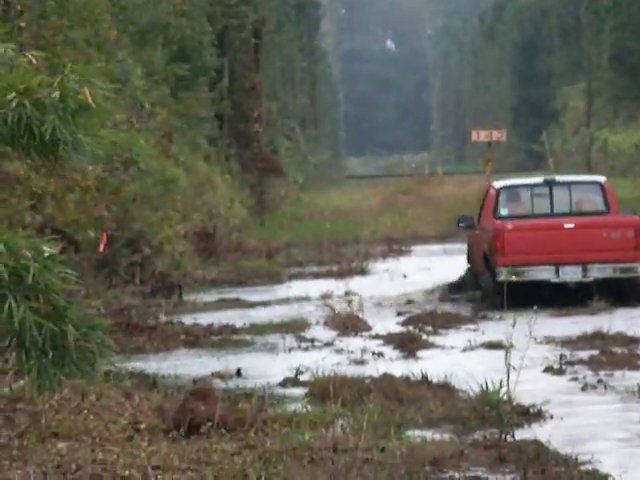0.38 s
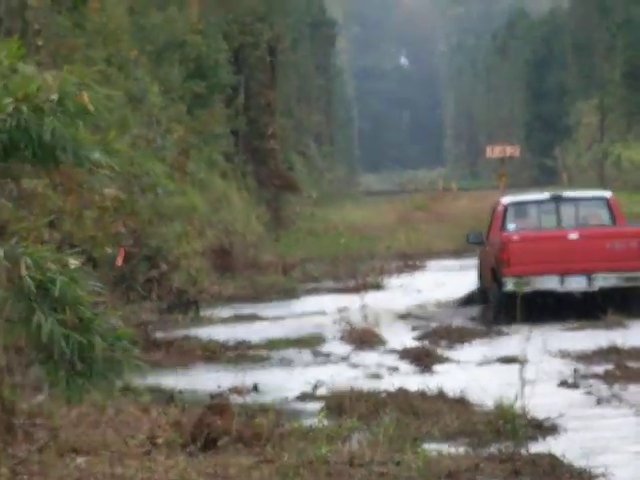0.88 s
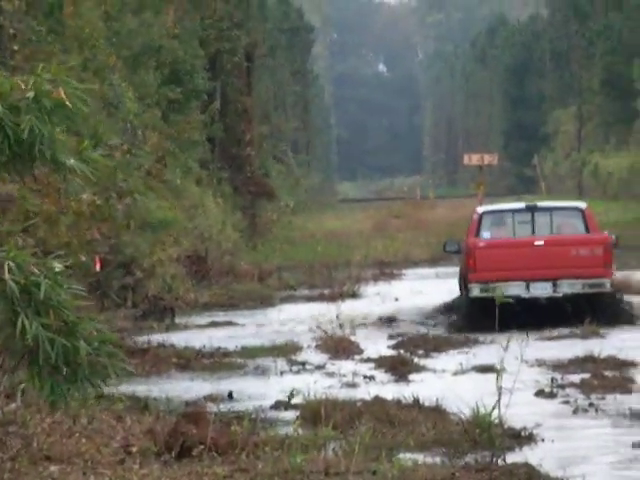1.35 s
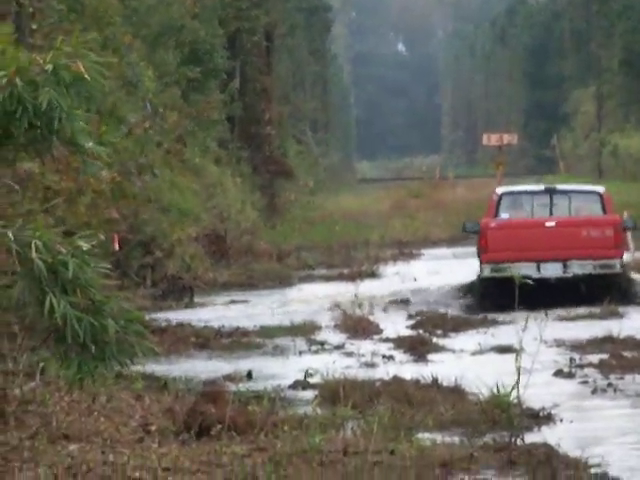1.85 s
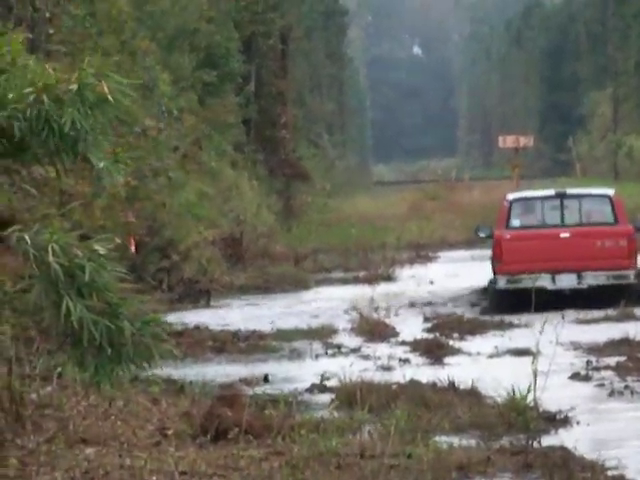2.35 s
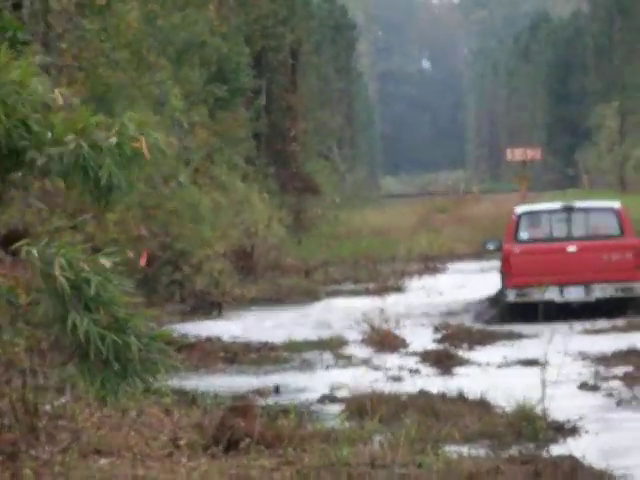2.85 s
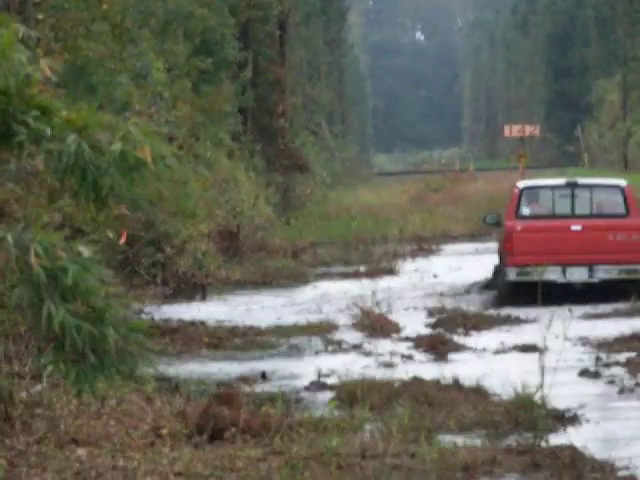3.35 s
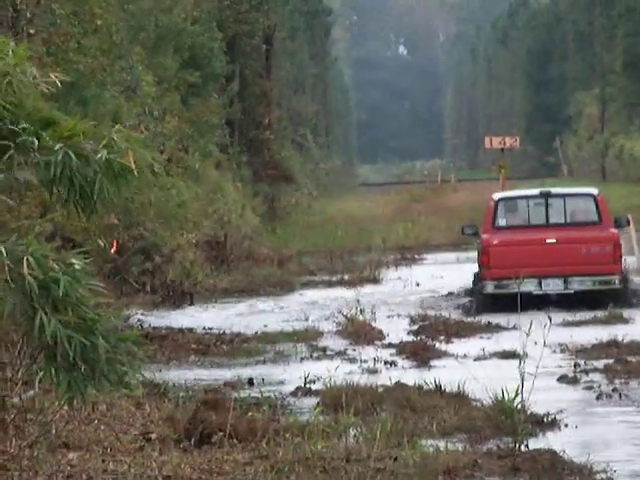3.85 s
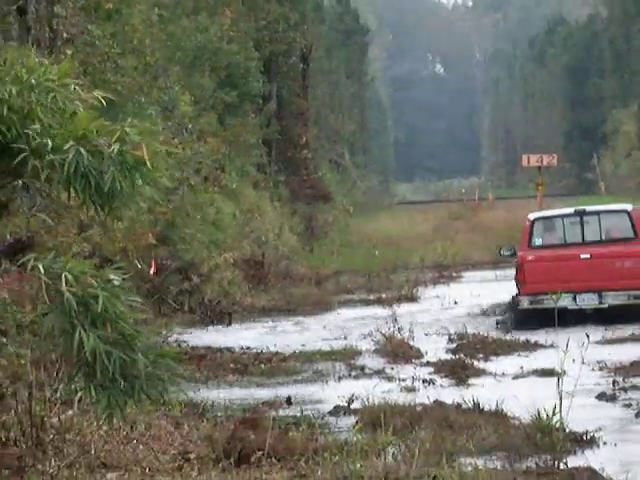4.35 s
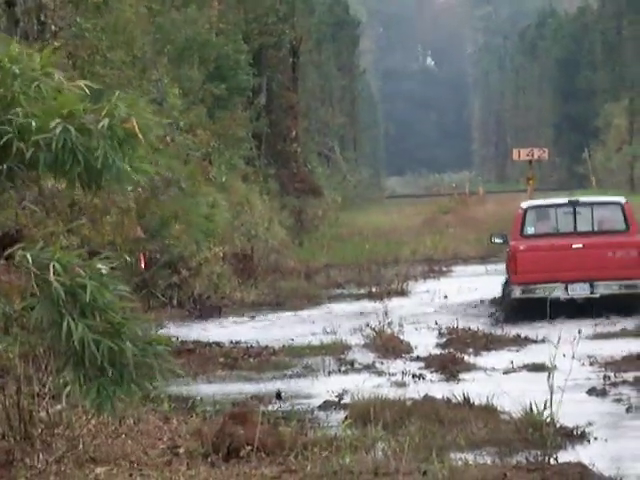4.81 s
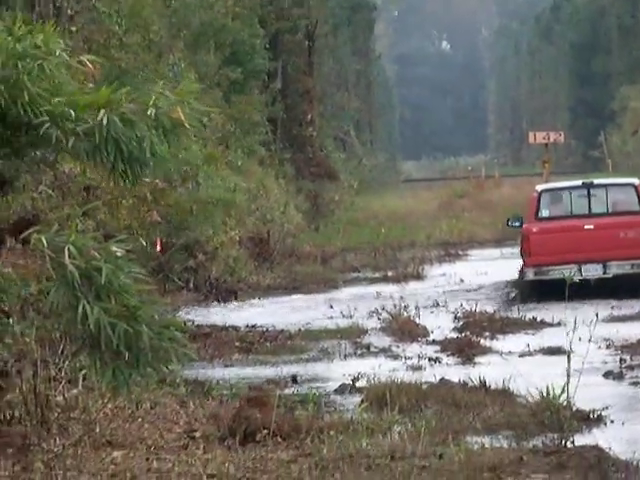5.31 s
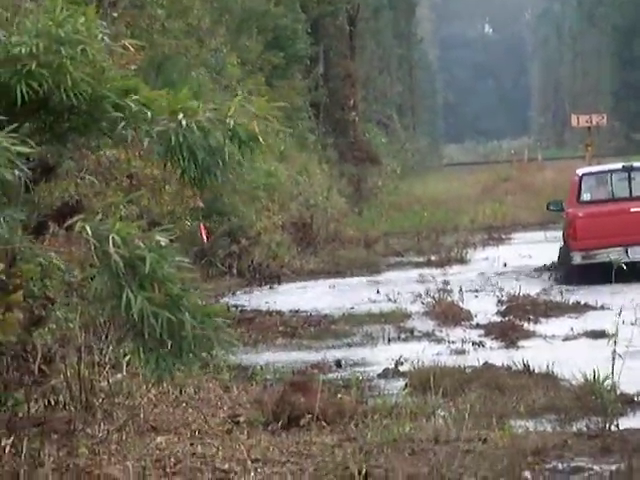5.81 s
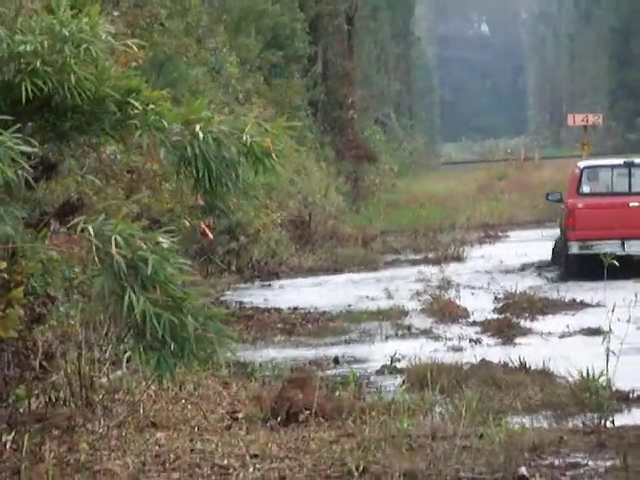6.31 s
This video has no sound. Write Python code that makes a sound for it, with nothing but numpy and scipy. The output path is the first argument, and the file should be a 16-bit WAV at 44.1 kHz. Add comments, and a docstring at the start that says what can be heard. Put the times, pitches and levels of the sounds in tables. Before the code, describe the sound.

A straining truck engine drones at some distance across a flooded muddy track, with humming metal, faint whines and flickering water spray. Low wind rumble and blunt thumps strike each side of the unshielded microphone. The engine sound sinks abruptly under a heavy gust, stays subdued, then rises to full strength. Two small rising mud bubbles pop soon after, and the roar continues to the end without stopping.

```python
"""A pickup stuck in deep mud holds its engine at a nearly steady speed. Exhaust, fan and whines are sums of
sine tones; the broad roar, humming panels and hiss of thrown water are shaped noise. The truck's level as
heard drops sharply near 1.8 s as a gust hits, as if the recorder turned itself down, and is back up by 4 s.
Two rising tones are bubbles leaving the mud. Wind buffets the two microphone ports separately, as low noise
in gusts and as short pointed swings."""
import sys
import numpy as np
from scipy import signal
from scipy.fft import rfft, irfft, next_fast_len
from scipy.io import wavfile
from scipy.ndimage import uniform_filter1d

SR = 44100
rng = np.random.default_rng(int(sys.argv[2]) if len(sys.argv) > 2 else 0)


def waveform_to_disk(signal):
    """Save audio, clipped to [-1, 1], as 16-bit WAV at the path in sys.argv[1]."""
    frames = np.transpose(np.atleast_2d(signal))
    scaled = np.clip(frames, -1, 1) * 32767
    samples = np.round(scaled).astype(np.int16)
    wavfile.write(sys.argv[1], SR, samples)


def ratio_of_db(decibels):
    """Turn decibels (scalar or array-like) into linear amplitude factors; 0 dB maps to 1."""
    return 10 ** (np.asarray(decibels, float) / 20)


N = 294588  # length of the scene in samples
USUAL_DB = -26.5  # the usual level at which the truck is heard


def evened(x):
    """Scales a signal to an rms of 1."""
    return x / np.sqrt(np.mean(x ** 2) + 1e-20)


def read(points, hz):
    """Reads a table of (Hz, value) at any frequency, along a logarithmic pitch scale."""
    f, value = np.transpose(points)
    return np.interp(np.log(hz + 1), np.log(f + 1), value)


def curve(rows, t):
    """Reads a table of (seconds, value) at the times t, with straight lines between rows."""
    seconds, value = np.transpose(rows)
    return np.interp(t, seconds, value)


def wander(top_hz):
    """Slow random drift of rms 1: twenty sines from 0.3 Hz to top_hz, the slower ones stronger."""
    t = np.arange(0, N + 256, 256)
    slow = 0
    for f in np.geomspace(.3, top_hz, 20):
        slow = slow + np.sin(2 * np.pi * (f * t / SR + rng.random())) / np.sqrt(f)
    return np.interp(np.arange(N), t, evened(slow))


def ports(x):
    """The truck at two ports: each frequency differs in level and arrives earlier at one of them."""
    # The right port resonates lower than the left.
    # Each row: frequency in Hz, level of left over right in dB.
    lean = [(60, .6), (270, 1.2), (600, 2.4), (950, 1.2), (1300, 2), (2240, -4.3), (2700, -3), (3400, -6.5),
            (4050, -5.6), (4750, -10), (5080, -3), (5350, 5.5), (5850, 15), (6400, 13.3), (7150, 10),
            (7900, 5.5)]
    # How far the left port is ahead. Each row: frequency in Hz, lead in radians.
    lead = [(0, 0), (600, -.05), (1120, -.45), (1400, -1), (1890, -1.4), (2150, -.9), (2900, -1.6),
            (3700, -.6), (4300, -.3), (5340, 1.9), (5770, .7), (6300, 2), (8000, 0)]
    size = next_fast_len(N)
    hz = np.fft.rfftfreq(size, 1 / SR)
    # Half of each difference goes to the left, the opposite half to the right.
    half = ratio_of_db(read(lean, hz) / 2) * np.exp(.5j * read(lead, hz))
    both = rfft(x, size) * np.array([half, 1 / half])
    return irfft(both, size)[:, :N]


def noise(gain_per_hz, patchy_db, size=1024):
    """Noise of rms 1 from random short-time spectra with drifting patches, partly alike on both sides."""
    # How alike left and right are. Each row: frequency in Hz, likeness from 0 to 1.
    likeness = [(60, .97), (250, .97), (600, .89), (1000, .82), (1500, .55), (2500, .35), (3800, .6),
                (4800, .35), (5800, .27), (6200, .11), (8000, .15)]
    frames, hz = 4 * N // size + 5, np.fft.rfftfreq(size, 1 / SR)
    a, b, c, d, patches = rng.standard_normal((frames, len(hz), 5)).T
    patches = uniform_filter1d(patches, size=12, axis=0)
    patches = evened(uniform_filter1d(patches, size=14, axis=1))
    same = np.clip(read(likeness, hz), -1, 1)[:, None]
    left = a + 1j * b
    right = same * left + np.sqrt(1 - same ** 2) * (c + 1j * d)
    spectra = np.array([left, right]) * gain_per_hz(hz)[:, None] * ratio_of_db(patchy_db * patches)
    sound = signal.istft(spectra, nperseg=size, noverlap=size - size // 4)[1]
    return evened(sound[:, :N])


def tones(turns, rows, sway, lead=0):
    """Sines at multiples of one rotation, each wandering in strength and, by sway radians, in phase."""
    total = 0
    for multiple, db, wander_db in rows:
        strength = np.sqrt(2) * ratio_of_db(db + wander_db * wander(5.2))
        phase = 2 * np.pi * multiple * turns + lead + sway * wander(4)
        total = total + strength * np.sin(phase)
    return total


def gusts(t):
    """Wind power at each port and the corner pitch: a constant breeze plus one smooth swell per gust."""
    # Each row: middle in seconds, length in seconds, left port level in dB, right port level in dB,
    # corner in Hz above which the gust's buffeting fades.
    gust_rows = [(.05, 0.2, -16.5, -21.5, 35), (0.347, 0.14, -17, -21, 40), (.7, .15, -24, -23.5, 35.2),
                 (1.106, .3, -19.5, -18, 34.8), (1.333, 0.17, -21.5, -19, 98.4),
                 (1.619, 0.75, -18, -11, 24.1), (1.842, 0.15, -12, -10.5, 152.5),
                 (2.088, 0.6, -17.5, -17, 25.4), (2.78, .55, -22, -15.5, 30.1),
                 (3.148, 0.37, -18, -18.5, 40), (3.577, .25, -21.5, -17.5, 35),
                 (4.244, 0.61, -18.5, -17, 39.9), (4.579, .3, -22.5, -14.5, 30),
                 (4.823, 0.46, -15, -15, 45), (5.301, 0.35, -26.5, -16.5, 56.3),
                 (5.578, 0.24, -15.5, -18, 24), (6.0, 0.27, -23.5, -26.5, 70), (6.52, .15, -23, -26.5, 45)]
    lull, lull_hz = ratio_of_db(2 * -28), 45  # power and corner of the breeze between gusts
    middle, length, left_db, right_db, corner_hz = np.transpose(gust_rows)[..., None]
    swell = np.cos(np.pi * np.clip((t - middle) / length, -.5, .5)) ** 2
    power = ratio_of_db(2 * np.array([left_db, right_db])) * swell
    both = power.sum(0)
    # The stronger a gust is at this moment, the more its corner counts.
    mixed_hz = (2 * lull * lull_hz + (both * corner_hz).sum(0)) / (2 * lull + both.sum(0))
    return lull + power.sum(1), mixed_hz


def wind():
    """Lumpy low pressure noise, unrelated at the two ports; sharp gusts reach higher in pitch."""
    frames, hz = N // 512 + 9, np.fft.rfftfreq(4096, 1 / SR)[:, None]
    frame_times = (np.arange(frames) * 512 - 256) / SR
    corner_hz = np.maximum(gusts(frame_times)[1], 10)
    shape = hz / (hz + 6.1) / (1 + (hz / corner_hz) ** 2) ** 1.18
    shape /= np.sqrt((shape ** 2).sum(0))  # the corner changes the color, not the power
    a, b = rng.standard_normal((frames, 2049, 2, 2)).T
    air = signal.istft((a + 1j * b) * shape, nperseg=4096, noverlap=3584)[1]
    air = evened(air[:, :N])
    # Chance swells are partly levelled.
    lumps = np.sqrt(0.2 + abs(uniform_filter1d(air ** 2, size=3000, axis=1)))
    flutter = ratio_of_db(2.5 * np.array([wander(12), wander(17)]))  # each port flutters by itself, 2.5 dB rms
    strength = np.sqrt(gusts(np.arange(N) / SR)[0])
    return strength * flutter * evened(air / lumps)


def buffets():
    """Each eddy slaps one port: a pointed push or pull, centred on its time, that swings and fades."""
    # Each row: middle in seconds, level in dB (the pointed peak stands 1 dB above it),
    # port (L or R), swing rate in Hz, length in seconds.
    buffet_rows = [(0.052, -11, "R", 60, 0.029), (0.124, -9, "R", 60, .035), (0.321, 2, "L", 55, 0.044),
                   (0.672, -10, "R", 60, .04), (0.709, -11, "L", 45, .05), (0.996, -11, "R", 75, .04),
                   (1.117, -8, "L", 60, 0.044), (1.315, -5.5, "L", 107, 0.041), (1.482, -5, "R", 70, .04),
                   (1.553, -2.5, "R", 59.4, .04), (1.658, -6, "L", 50, .04), (1.709, -11.5, "L", 55, 0.028),
                   (1.762, -10.5, "R", 130, .04), (1.802, -4.5, "L", 60, .035),
                   (1.839, -0.5, "R", 100.5, 0.05), (1.862, -9.5, "L", 149, 0.036),
                   (1.864, -11, "L", 330, .03), (1.909, -4, "L", 49.8, .045), (1.9, -4, "R", 75, .04),
                   (1.999, -7, "R", 70, .045), (2.645, -6.5, "R", 69.6, 0.065), (2.671, -8.5, "R", 42, .05),
                   (2.733, -9, "L", 45, .045), (2.796, -14, "R", 45, 0.034), (2.851, -2, "R", 48, 0.048),
                   (2.879, -10.5, "R", 55, 0.032), (3.051, -5.5, "R", 42, .055),
                   (3.124, -9, "L", 55, 0.048), (3.19, -8, "R", 90, .04), (3.211, -8.5, "L", 110, 0.016),
                   (3.244, -2.5, "L", 52, .045), (3.559, -6, "R", 50, .04), (4.069, -8.5, "R", 79, .05),
                   (4.142, -7.5, "R", 49.7, .04), (4.325, -5, "R", 51, .05), (4.386, -10.5, "R", 75, 0.071),
                   (4.556, -11.5, "R", 54.7, 0.039), (4.696, -7, "R", 64.7, .04),
                   (4.735, -6.5, "L", 69.5, .04), (4.812, -7.5, "R", 45, .045),
                   (4.859, -7.5, "L", 59.8, .04), (5.019, -6, "R", 50, 0.044), (5.162, -6, "R", 65.3, .06),
                   (5.3, -5, "R", 49.7, .04), (5.346, -7.5, "L", 65.6, .04), (5.603, -11, "R", 55, .04),
                   (6.511, -9, "L", 49.8, 0.046)]
    out = np.zeros((2, N))
    pushes = rng.choice([-1., 1.], len(buffet_rows))
    for (s, db, port, hz, length), push in zip(buffet_rows, pushes):
        size = round(length * SR)
        t = (np.arange(size) - size // 2) / SR
        point = 0.6 + 0.52 * np.exp(-abs(t) / 0.0022)
        swing = np.hanning(size) * point * np.cos(2 * np.pi * hz * t)
        start = round(s * SR) - size // 2
        out["LR".index(port), start:][:size] += push * ratio_of_db(db) * swing
    return out


def glugs():
    """Air bubbles leaving the mud: a bubble's pitch rises unsteadily as it nears the surface."""
    # Each row: start in seconds, level in dB midway between the ports, start pitch in Hz,
    # end pitch in Hz, length in seconds.
    bubbles = [(4.222, -22, 310, 591, 0.1), (4.29, -24.5, 382, 456, 0.04)]
    out = np.zeros(N)
    for s, db, start_hz, end_hz, length in bubbles:
        hz = np.linspace(start_hz, end_hz, round(length * SR))
        wobble = evened(uniform_filter1d(rng.standard_normal(len(hz)), size=300))
        tone = np.sin(2 * np.pi * np.cumsum(hz) / SR + 0.84 * wobble)
        swell = np.sqrt(np.hanning(len(hz)))
        out[round(s * SR):][:len(hz)] += np.sqrt(2) * ratio_of_db(db) * swell * tone
    return out * ratio_of_db([[-1.5], [1.5]])  # quieter on the left


def spray():
    """Hiss of thrown water: shaped noise that flickers as splashes land across all bands."""
    # Each row: frequency in Hz, relative level per Hz in dB.
    hiss = [(600, -8), (950, -5.5), (1350, -6), (1700, -6.5), (2000, -8), (2500, -8), (3200, -7),
            (3900, -4.5), (4150, -5), (4350, -1.5), (4680, 0), (5100, 0.5), (5250, -1.5), (5550, -1.5),
            (5850, -3), (6200, -9), (6700, -15), (7400, -21.5), (8150, -29.5), (8450, -51.5), (9500, -85)]
    flicker_db = 0.43 * evened(uniform_filter1d(rng.standard_normal(N), size=1500))
    # 0.52 dB against the truck's heard level
    return ratio_of_db(0.52 + flicker_db) * noise(lambda hz: ratio_of_db(read(hiss, hz)), patchy_db=0.2)


def hum():
    """Humming sheet metal: noise through steep narrow resonances, each holding its share of the power."""
    # Each row: frequency in Hz, width in Hz, relative level in dB.
    panels = [(176, 22, -7), (330, 70, -9), (620, 55, -17), (843, 55, -16), (994, 10, -24), (1165, 22, -23),
              (1364, 30, -23), (1828, 28, -21), (2160, 20, -29), (2278, 30, -22), (2849, 40, -28)]

    def resonances(f):
        return sum(ratio_of_db(db) / np.sqrt(width) / (1 + (2 * (f - hz) / width) ** 2) for hz, width, db in panels)

    power = sum(ratio_of_db(2 * db) for _, _, db in panels)
    # 1.5 dB on top of the panels' summed power
    return ratio_of_db(1.5) * np.sqrt(power) * noise(resonances, patchy_db=1.5, size=8192)


def roar(crank):
    """Broad engine roar: shaped noise that throbs slightly once and twice per crank turn."""
    # Each row: frequency in Hz, relative level per Hz in dB.
    spectrum = [(30, -19), (60, -1.5), (90, -1), (115, -1), (143, -6), (165, -4.5), (205, -7), (280, -7.5),
                (420, -9.5), (520, -14), (850, -18), (1050, -26.5), (1500, -33), (2200, -72)]
    throb = 1 + .03 * np.cos(2 * np.pi * crank) + .05 * np.cos(4 * np.pi * crank)
    # 5 dB against the truck's heard level
    return ratio_of_db(5) * throb * noise(lambda hz: ratio_of_db(read(spectrum, hz)), patchy_db=.5)


def fan(t, heard_db):
    """Cooling fan: tones at multiples of the steady rate at which its blades pass."""
    # Each row: multiple of the blade rate, level in dB against the usual heard level, wander in dB.
    fan_tones = [(1, -5.5, .8), (2, -5.5, 1.2), (5, -26, 2)]
    blade_hz, follows = 222.1, .8  # blades passing a second; share of level changes reaching the fan
    # Off to one side, the fan gets an extra lead of 0.4 radians at the left port.
    lead = 0.4 * np.array([[.5], [-.5]])
    # The full level curve is applied later, so part of its change is undone here.
    held_back = ratio_of_db((follows - 1) * (heard_db - USUAL_DB))
    return held_back * tones(blade_hz * t, fan_tones, sway=.3, lead=lead)


def whine(t):
    """Thin belt-driven whines: faint tones of unsteady phase."""
    # Each row: frequency in Hz, level against the truck's heard level in dB, wander in dB.
    whines = [(1831, -33, 2), (2277, -35, 2)]
    return tones(t, whines, sway=2.5)


def exhaust(t, crank, heard_db):
    """Exhaust: a firing boom and upper orders tied to the crank, and a drone of fixed pitch."""
    # The firing boom. Each row: multiple of the crank speed, relative level in dB, wander in dB.
    low_order = [(2, -0.5, 0.5)]
    # Higher exhaust orders. Each row: multiple of the crank speed, relative level in dB, wander in dB.
    upper_orders = [(4, -6.5, 1), (5, -3, .8)]
    # The drone. Each row: multiple of its pitch, relative level in dB, wander in dB.
    drone = [(1, -8, 2.5)]
    drone_hz, blur_s = 127, 0.13  # level changes are evened over blur_s
    slow_db = uniform_filter1d(heard_db, round(blur_s * SR)) - USUAL_DB
    # Base levels at the usual heard level; only a share of its changes reaches these tones.
    low_db = -21 + 0.72 * slow_db
    upper_db = -22 + 0.64 * slow_db
    sound = ratio_of_db(low_db) * tones(crank, low_order, sway=.25)
    sound += ratio_of_db(upper_db) * tones(crank, upper_orders, sway=.35)
    sound += ratio_of_db(upper_db) * tones(drone_hz * t, drone, sway=.7)
    return sound


def truck():
    """The whole truck: exhaust on its own levels, everything else scaled by one curve of heard level."""
    # The level at which the truck is heard, with sudden dips and recoveries.
    # Each row: time in seconds, level in dB.
    heard_level = [(0.0, -31), (0.3, -28), (0.33, -30), (0.61, -27.5), (1.11, -27.5), (1.8, -24.5),
                   (1.84, -32.5), (1.99, -36), (2.18, -33), (3.07, -32.5), (4.0, -21), (4.22, -21.5),
                   (4.35, -25), (4.82, -24), (5.04, -21), (5.23, -23), (5.53, -20.5), (5.64, -25),
                   (5.86, -22), (6.68, -21.5)]
    # Each row: time in seconds, firing pair rate in Hz, which is twice the crank speed.
    pair_rate = [(0, 41), (.75, 40.7), (1.25, 41.3), (2.25, 41.5), (2.75, 41.9), (3.75, 42.3), (4.6, 41.75),
                 (5.3, 41.85), (5.75, 41.6), (6.3, 42.1), (6.68, 42.1)]
    t = np.arange(N) / SR
    heard_db = curve(heard_level, t)
    crank = np.cumsum(curve(pair_rate, t) / 2) / SR  # crank turns so far
    body = fan(t, heard_db) + whine(t) + roar(crank) + hum() + spray()
    return ports(exhaust(t, crank, heard_db) + ratio_of_db(heard_db) * body)


def scene():
    """Wind, mud and truck together."""
    return wind() + buffets() + glugs() + truck()


def roll_off(x):
    """The treble ends steeply here."""
    return signal.sosfilt(signal.butter(12, 8630, fs=SR, output="sos"), x)


def record(dry):
    """The input stage smoothly rounds off swings beyond a knee, so none passes full scale."""
    knee = .75  # share of full scale
    over = np.maximum(abs(dry) - knee, 0)
    bend = (1 - knee) * np.tanh(over / (1 - knee))
    rounded = np.clip(dry, -knee, knee) + np.sign(dry) * bend
    return roll_off(rounded)


dry = scene()
out = record(dry)
waveform_to_disk(out)
```